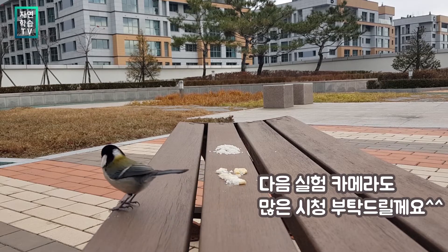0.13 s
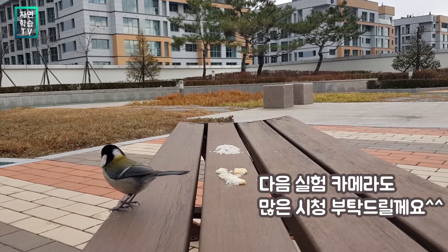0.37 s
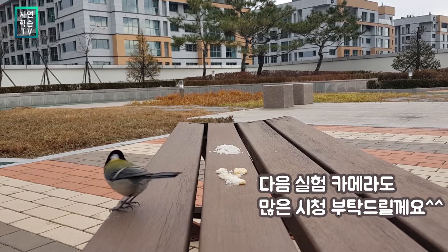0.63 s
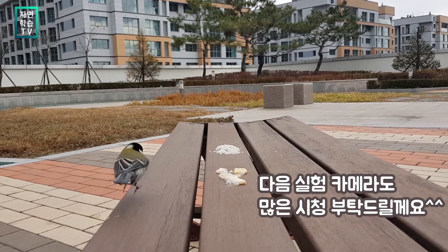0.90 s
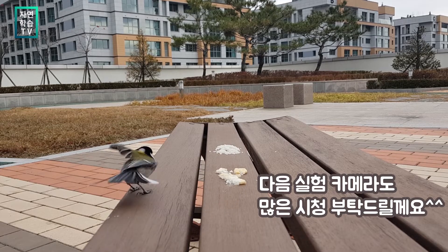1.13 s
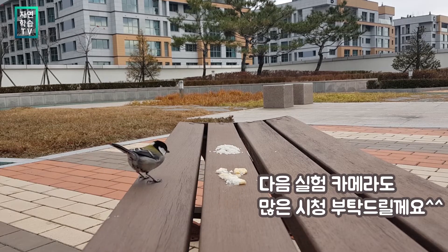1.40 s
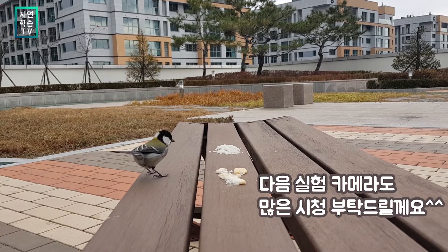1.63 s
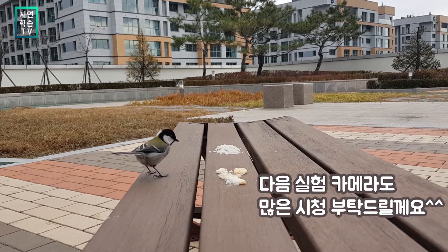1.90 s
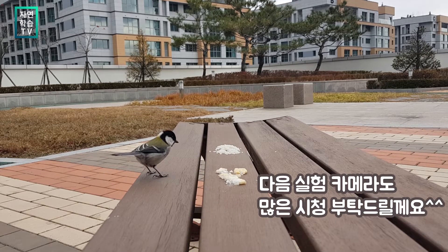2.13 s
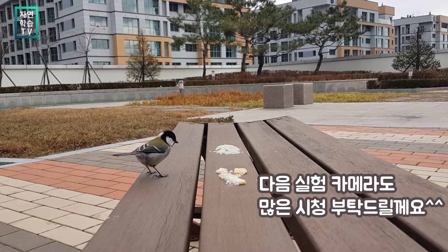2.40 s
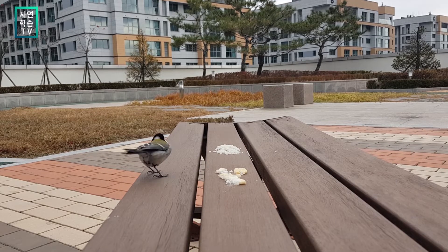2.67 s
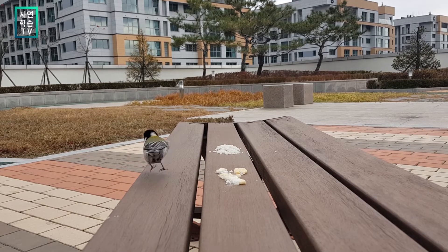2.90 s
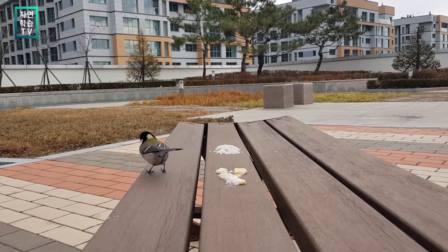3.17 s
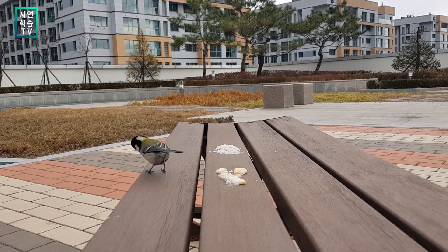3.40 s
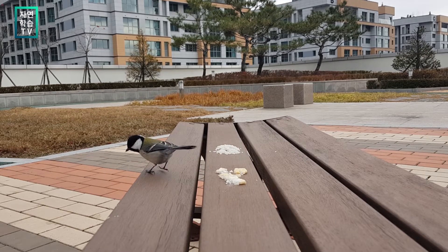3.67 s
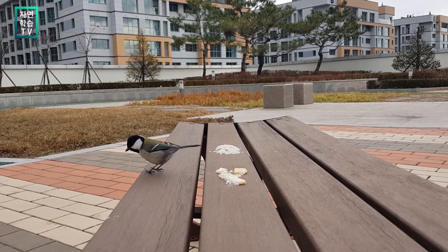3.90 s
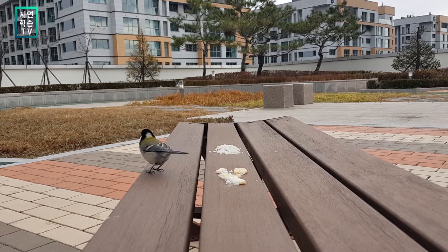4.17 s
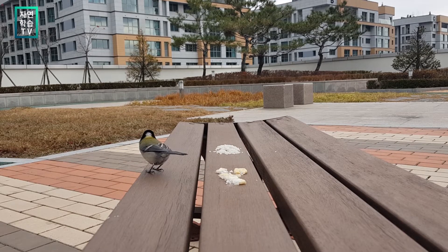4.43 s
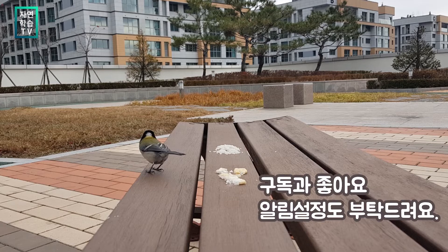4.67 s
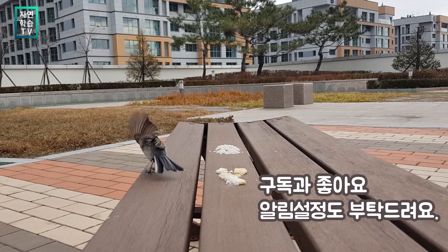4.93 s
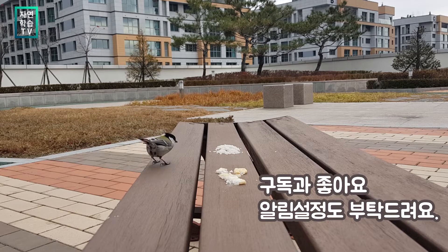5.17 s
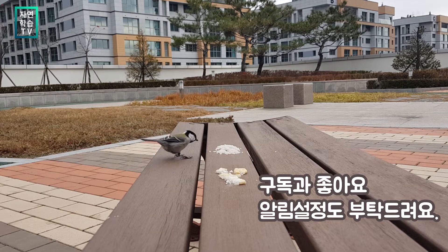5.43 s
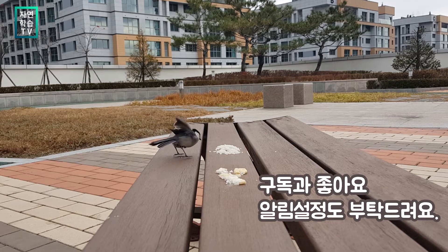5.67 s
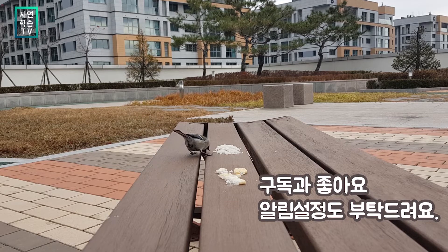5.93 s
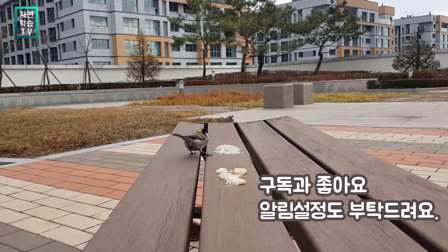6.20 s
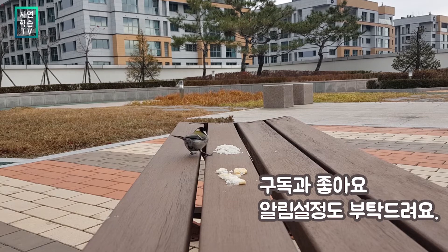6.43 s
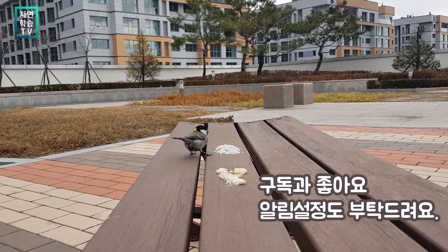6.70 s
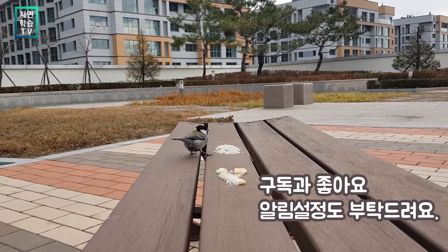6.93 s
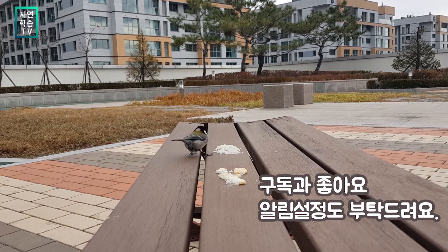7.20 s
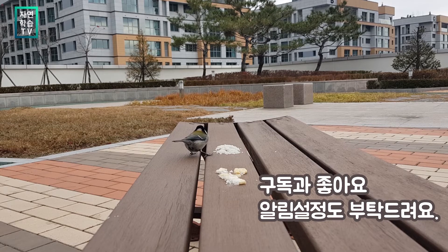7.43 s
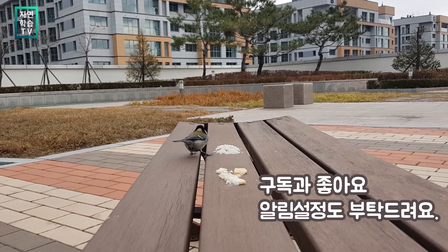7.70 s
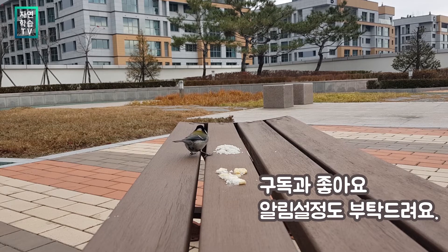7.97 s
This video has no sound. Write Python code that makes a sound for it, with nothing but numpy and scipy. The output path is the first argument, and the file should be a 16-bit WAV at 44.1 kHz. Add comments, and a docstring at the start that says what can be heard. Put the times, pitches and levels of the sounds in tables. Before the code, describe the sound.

Over a low wavering outdoor rumble, songbirds give buzzy chirps with faint wall echoes while a small bird's claws tick and rustle close on wood.

```python
"""Songbirds in a paved courtyard

Between apartment blocks songbirds repeat buzzy rising chirps, mostly off to the right, one higher and rougher
from the left. They are fluttering near sines, with faint glides and two clean looping calls; delayed copies and
a fading noise tail are the echoes of the walls. A small bird hops on a wooden bench by the left microphone port:
noise rings its claws and the plank, and patchy noise rustles. Traffic rumble, the wavering drone of a distant
machine and microphone hiss are shaped noise, and a thin whine is drifting sines."""
import sys
import numpy as np
from scipy import signal
from scipy.fft import rfft, irfft
from scipy.io import wavfile
from scipy.ndimage import uniform_filter1d

SR = 44100
rng = np.random.default_rng(int(sys.argv[2]) if len(sys.argv) > 2 else 0)


def makeup_ratio(level_db):
    """Linear amplitude ratio for a level in decibels (20 dB per factor of ten)."""
    decades = np.asarray(level_db, float) / 20
    return 10 ** decades


def wav_record(signal):
    """Record a signal, one row per channel, as 16-bit PCM in the file named by sys.argv[1]."""
    frames = np.transpose(np.atleast_2d(signal))
    bounded = np.clip(frames, -1, 1)
    # unit amplitude maps onto the largest positive 16-bit level
    quanta = np.round(bounded * 32767).astype(np.int16)
    wavfile.write(sys.argv[1], SR, quanta)


N = 356195
TIME = np.arange(N) / SR  # s
BINS = np.fft.rfftfreq(2 ** 19, 1 / SR)  # Hz
LAG_MS = .62  # how late drone, hiss and whine reach the left port
SILENT_DB = -80  # level at the ends of chirps and glides

# tones of a struck claw: (pitch [Hz], relative level [dB], time to fall by 60 dB [s])
CLAW_MODES = [(6570, 4.5, 0.0029), (10900, -8, 0.0037), (10400, -5, 0.0023), (8400, -3, 0.0017),
              (5900, -13, 0.0009)]


def walk(rate):
    """Random levels held 1 / rate s and smoothed twice; spread near 1."""
    k = int(SR / rate)
    steps = np.repeat(rng.standard_normal(N // k + 1), k)
    return 1.3 * uniform_filter1d(uniform_filter1d(steps, k), k)[:N]


def ports(x, pan_db, lag_ms):
    """One sound at both ports, left pan_db above right; the left is late, or the right if the lag is negative."""
    lag = int(lag_ms * SR / 1000)
    left = np.pad(x, (max(lag, 0), 0))[:len(x)]
    right = np.pad(x, (max(-lag, 0), 0))[:len(x)]
    return np.array([left * makeup_ratio(pan_db / 2), right * makeup_ratio(-pan_db / 2)])


def ring(x, modes):
    """Tones that die away, set ringing by x."""
    t = TIME[:1024]
    tones = sum(makeup_ratio(db) * np.exp(-np.log(1000) * t / t60) * np.sin(2 * np.pi * hz * t)
                for hz, db, t60 in modes)
    return signal.fftconvolve(x, tones)[:len(x)]


def add(out, sound, s):
    """Mix a two-port sound in at a moment."""
    i = int(s * SR)
    out[:, i:i + sound.shape[1]] += sound[:, :N - i]


def whistle(rows, overtone_db, rate_hz=0, depth_hz=0, throb=0):
    """A near sine from the syrinx; uneven flutter shakes the pitch and, a quarter turn later, the loudness."""
    s, hz, db = np.transpose(rows)
    t = np.arange(s[0], s[-1], 1 / SR)
    knots = np.linspace(s[0], s[-1], num=16)
    pace, size = (np.interp(t, knots, row) for row in rng.standard_normal((2, 16)))
    # the wider the swing beyond 55 Hz, the less even the flutter
    uneven = .0018 * max(depth_hz - 55, 0)
    turn = 2 * np.pi * (np.cumsum(rate_hz * (1 + uneven * pace)) / SR + rng.random())
    # the flutter rests at both ends and grows over 15 ms
    ramp = np.clip(np.minimum(t - s[0], s[-1] - t) / .015 - .5, 0, 1)
    swing = (1 + 4 * uneven * size) * ramp
    pitch = np.interp(t, s, hz) + depth_hz * swing * np.sin(turn)
    phase = 2 * np.pi * np.cumsum(pitch) / SR
    tone = np.sin(phase) + makeup_ratio(overtone_db) * np.sin(2 * phase)
    loudness = np.sqrt(2) * np.interp(t, s, makeup_ratio(db)) * (1 - throb * swing * np.cos(turn))
    return np.pad(loudness * tone, (0, 64))


def chirp(length_s, hz, rise_hz, db, swing_hz):
    """A buzzy chirp scoops up into its pitch, climbs evenly and flicks to the end of a fixed total climb."""
    scoop_s, scoop_hz, flick_s, climb_hz = .020, 240, .020, 340
    attack_s, attack_db, swell_db, release_s, release_db = .008, -3, 1.5, .004, -2
    low, high = hz - rise_hz / 2, hz + rise_hz / 2
    bends = [0, scoop_s, length_s - flick_s, length_s]
    s = [0, attack_s, scoop_s, length_s - flick_s, length_s - release_s, length_s]
    pitch = np.interp(s, bends, [low - scoop_hz, low, high, low + climb_hz])
    level = [SILENT_DB, db + attack_db, db - swell_db / 2, db + swell_db / 2, db + release_db, SILENT_DB]
    # higher chirps flutter faster
    rate_hz = 114.9 + 0.102 * (hz - 4260)
    return whistle(np.transpose([s, pitch, level]), -15, rate_hz, swing_hz, throb=.3)


def songbirds():
    """Buzzy chirps, faint glides and looping calls, then the echoes of the yard."""
    # buzzy chirps, mostly from the right: (start [s], length [s], middle pitch [Hz], rise of the even climb [Hz],
    # level [dB], left minus right [dB], flutter swing before it turns uneven [Hz])
    chirp_table = [(0.271, .110, 4280, 100, -56, -7, 75), (0.665, 0.1, 4150, 131, -53.5, -4, 75),
                   (0.994, 0.1, 4790, 30, -54.5, 5, 140), (1.47, 0.088, 4300, 90, -57.5, -5, 85),
                   (2.161, 0.13, 4380, 110, -60.5, -11, 80), (2.612, 0.11, 4200, 90, -59, -7, 70),
                   (2.983, 0.12, 4255, 90, -55.5, -8, 82), (3.41, .100, 4200, 70, -55, -8, 75),
                   (3.877, 0.12, 4410, 160, -56.5, -11, 125), (4.307, 0.13, 4450, 240, -57, -11.5, 73),
                   (5.219, .120, 4215, 70, -56.5, -3, 85), (5.771, 0.13, 4240, 90, -56.5, -5, 78),
                   (6.065, 0.087, 4460, 130, -62.5, -2.5, 80)]
    # faint single glides: (start [s], length [s], first pitch [Hz], last pitch [Hz], level in the middle [dB])
    glide_table = [(1.425, .058, 2900, 4200, -69), (1.830, .020, 3200, 2850, -66),
                   (2.522, .016, 3750, 2900, -60), (3.386, .032, 2850, 4050, -69),
                   (5.128, .018, 3450, 2950, -68)]
    # two clean looping calls, one list each: (time [s], pitch [Hz], level [dB])
    call_tables = [
        [(6.764, 3650, -75), (6.769, 4000, -63), (6.774, 4530, -75), (6.782, 4780, -64), (6.808, 4710, -60),
         (6.813, 4250, -64), (6.817, 3800, -52), (6.821, 3800, -52), (6.825, 4200, -64), (6.831, 4950, -74)],
        [(7.582, 4700, -80), (7.590, 4850, -69), (7.604, 5000, -75), (7.608, 4750, -64), (7.613, 3950, -61),
         (7.618, 4250, -68), (7.624, 4470, -55), (7.632, 4420, -66), (7.640, 4250, -65), (7.646, 3750, -66),
         (7.650, 3500, -76)],
    ]
    bird_lag_ms, call_lag_ms, overtone_db = .665, .235, -12
    out = np.zeros((2, N))
    for s, length_s, hz, rise_hz, db, pan_db, swing_hz in chirp_table:
        add(out, ports(chirp(length_s, hz, rise_hz, db, swing_hz), pan_db, bird_lag_ms), s)
    for s, length_s, first_hz, last_hz, db in glide_table:
        rows = [(s, first_hz, SILENT_DB), (s + length_s / 2, (first_hz + last_hz) / 2, db),
                (s + length_s, last_hz, SILENT_DB)]
        add(out, ports(whistle(rows, overtone_db), -8, bird_lag_ms), s)
    for rows in call_tables:
        add(out, ports(whistle(rows, overtone_db), -3, call_lag_ms), rows[0][0])
    return yard(out)


def yard(birds):
    """Walls send back near echoes and a scattered tail, drawn apart for each port."""
    # nearest echoes: (delay [s], level [dB])
    wall_table = [(.012, -10), (.072, -18)]
    t60_s, tail_db = .6, -11
    t = TIME[:SR]
    fade = np.exp(-np.log(1000) * t / t60_s) * np.minimum(t / 0.014, 1)
    tail = rng.standard_normal((2, SR)) * fade
    tail *= makeup_ratio(tail_db) / np.sqrt(np.sum(tail ** 2, axis=1, keepdims=True))
    wet = signal.fftconvolve(birds.mean(axis=0, keepdims=True), tail, axes=1)[:, :N]
    echoes = sum(makeup_ratio(db) * np.roll(birds, int(s * SR), axis=1) for s, db in wall_table)
    return birds + wet + echoes


def claws():
    """A sharp touch and a short gritty scrape ring the claw and knock the plank."""
    # claws on the bench: (time [s], peak of the claw's ring before panning [dB],
    # decay time of the scrape [s], knock of the plank relative to that ring [dB])
    claw_table = [(.8135, -45, .009, -14), (.9318, -44, .003, -5), (.942, -51, .008, -3),
                  (.9527, -41, .005, -2), (1.1618, -44, .009, -10), (1.2476, -41, .003, -9),
                  (1.2574, -42, .003, -9), (1.2815, -48, .004, -5), (1.2914, -50, .004, -8),
                  (1.3114, -50, .004, -8), (1.5444, -52, .003, -10), (2.7554, -50, .006, -8),
                  (2.9257, -45, .003, -10), (2.9404, -48, .002, -12), (5.0764, -49, .004, -8),
                  (5.0924, -51, .003, -8), (5.2994, -49, .008, -12), (5.4164, -47, .004, -5),
                  (5.4344, -50, .003, -6), (5.7394, -50, .010, -8), (6.2260, -30, .0004, -12)]
    # tones of the plank: (pitch [Hz], relative level [dB], time to fall by 60 dB [s])
    plank_modes = [(2020, 1, 0.017), (3220, 7, 0.0033), (4850, 8, 0.0037)]
    out, t = np.zeros((2, N)), TIME[:2048]
    grit = rng.standard_normal((len(claw_table), 2, len(t)))
    for (s, db, scrape_s, knock_db), (a, b) in zip(claw_table, grit):
        # two noises multiplied make a spikier, grittier one
        push = a * b * (1 - np.exp(-t * SR / 4)) * np.exp(-t / max(scrape_s, .0002))
        tick, knock = ring(push, CLAW_MODES), ring(push, plank_modes)
        hit = tick / np.abs(tick).max() + makeup_ratio(knock_db) * knock / np.abs(knock).max()
        add(out, ports(makeup_ratio(db) * hit, 6.5, -.07), s)
    return out


def shuffle():
    """Feathers and feet: patchy noise through the claw tones makes a treble rustle close to the left port."""
    # bouts of hopping: (start [s], end [s], level before panning [dB])
    bout_table = [(0.798, 1.6, -67), (2.616, 2.95, -66.5), (5.0, 5.5, -70), (5.7, 6.3, -73.5)]
    fade_s = 0.08  # before each start and after each end
    rustle = ring(rng.standard_normal(N) * makeup_ratio(4.4 * walk(60)), CLAW_MODES)
    bouts = sum(makeup_ratio(db) * np.clip(np.minimum(TIME - start, end - TIME) / fade_s + 1, 0, 1)
                for start, end, db in bout_table)
    return ports(rustle / rustle.std() * bouts, 9.8, -.07)


def along(table, column):
    """A table column read at every frequency, in straight lines on a log frequency axis."""
    rows = np.array(table, float)
    return np.interp(np.log(BINS + 1e-9), np.log(rows[:, 0]), rows[:, column])


def noises():
    """Spectra of three unrelated white noises, 0 dB per Hz."""
    return rfft(rng.standard_normal((3, 2 * len(BINS) - 2))) * np.sqrt(SR / 2)


def wash(table, likeness, lag_ms):
    """Noise at two ports: a shared part that reaches the left late, and a part of each port's own."""
    shared, left, right = noises()
    same, own = np.sqrt(np.clip(likeness, 0, 1)), np.sqrt(np.clip(1 - likeness, 0, 1))
    late = np.exp(-2j * np.pi * BINS * lag_ms / 1000)  # a delay turns the phase
    left = makeup_ratio(along(table, 1)) * (same * late * shared + own * left)
    right = makeup_ratio(along(table, 2)) * (same * shared + own * right)
    return irfft(np.array([left, right]) * (BINS > 8))[:, :N]


def traffic():
    """Rumble: noise weighted to the bass, more alike at both ports in the low end, its level wandering."""
    # average rumble: (frequency [Hz], left level [dB per Hz], right level [dB per Hz])
    rumble_table = [(15.6, -71, -88), (27.2, -59, -53.5), (44.7, -49, -47), (68.3, -56, -53),
                    (90, -52.5, -55.5), (126, -58.5, -56.5), (209.5, -63.5, -62), (325, -68, -67.5),
                    (546, -69.5, -68), (812, -74, -72), (1147, -81.5, -82), (1592, -94, -88),
                    (2210, -99, -103), (2930, -115, -115)]
    # how far both ports hear the same: (frequency [Hz], likeness [0-1], lag of the left port [ms])
    likeness_table = [(16, 0.8, .6), (40, 0.72, 0.18), (88, 1, 0.17), (197, 0.83, 0.47), (356, 0.7, 0.39),
                      (466, 0.29, 0.73), (770, 0.64, 0.56), (1100, 0.26, 0.71), (2010, 0.03, 0.52)]
    rumble = wash(rumble_table, along(likeness_table, 1), along(likeness_table, 2))
    return rumble * makeup_ratio(.5 * walk(1.736))


def drone():
    """Narrow noise bands waver as the lines of a distant machine, largely alike at both ports."""
    # lines of the machine: (frequency [Hz], relative level [dB], width [Hz])
    line_table = [(23.9, -40, 4.5), (36.9, -38.5, 8.1), (52.8, -40, 4.2), (76.94, -41, 4.7),
                  (103.7, -43.5, 3.04), (153.8, -52.5, 4.4)]
    lines = sum(makeup_ratio(db) / np.sqrt(width) * np.exp(-((BINS - hz) / width) ** 2)
                for hz, db, width in line_table)
    shared, left, right = irfft(noises() * lines)[:, :N]
    return ports(shared, 0.98, LAG_MS) + makeup_ratio(-12.0) * np.array([left, right])


def hiss():
    """Microphone hiss: shaped noise, mostly different at the two ports, its level wandering slightly."""
    # average hiss: (frequency [Hz], left level [dB per Hz], right level [dB per Hz])
    hiss_table = [(1470, -110, -110), (2040, -102, -103), (2420, -100, -95), (2630, -101.5, -95),
                  (4000, -103, -100), (4500, -103.5, -101), (4900, -107, -108), (5830, -109, -105.5),
                  (6570, -105, -103.5), (7060, -101, -96), (8600, -99, -98.5), (9500, -100, -102.5),
                  (10200, -101, -102), (12300, -99.5, -103.5)]
    return wash(hiss_table, 0.16, LAG_MS) * makeup_ratio(.5 * walk(6.12))


def whine():
    """Thin high sines, stronger at the right, swell together while each drifts in level and pitch."""
    # tones: (middle pitch [Hz], peak level before swell, drift and panning [dB])
    tone_table = [(7241, -76.5), (7348, -85), (8398, -92)]
    # common swell: (time [s], gain [dB])
    swell_table = [(0, -9), (4.8, -2), (5.3, 7), (5.9, -3), (6.2, 6), (8.1, 4.5)]
    swell = np.interp(TIME, *np.transpose(swell_table))
    tones = np.zeros(N)
    for hz, db in tone_table:
        fade_db, drift_hz = 3 * walk(4), 4 * walk(6)
        phase = 2 * np.pi * np.cumsum(hz + drift_hz) / SR
        tones += makeup_ratio(db + swell + fade_db) * np.sin(phase)
    return ports(tones, -9, LAG_MS)


def scene():
    """Birds over the steady ground of the yard."""
    birds = songbirds() + claws() + shuffle()
    return birds + traffic() + drone() + hiss() + whine()


def top_cut(x):
    """Nothing passes above the cut-off."""
    return signal.sosfilt(signal.butter(12, 13340, fs=SR, output="sos"), x)


def record(dry):
    """The treble above 12030 Hz is cut steeply."""
    low_pass = signal.ellip(12, .2, 80, 12030, fs=SR, output="sos")
    cut = signal.sosfilt(low_pass, dry)
    return top_cut(cut)


dry = scene()
out = record(dry)
wav_record(out)
```